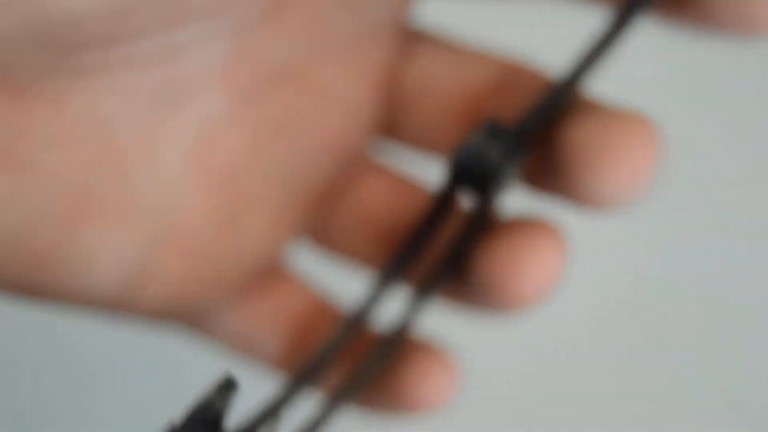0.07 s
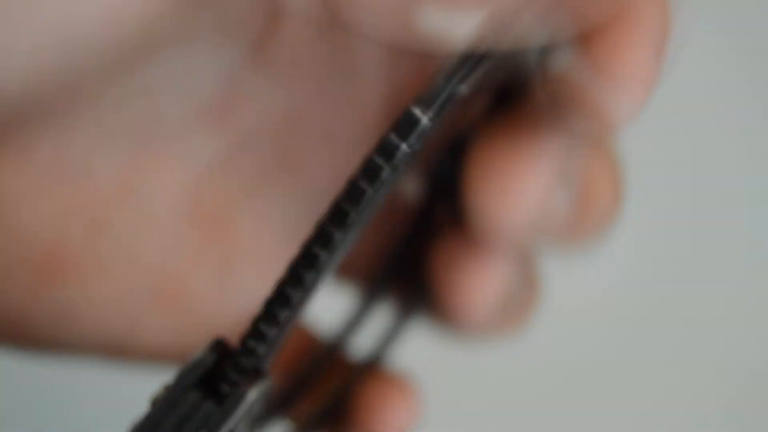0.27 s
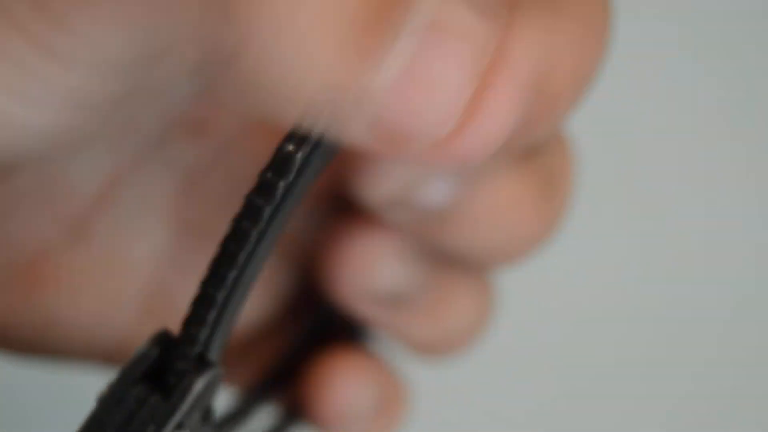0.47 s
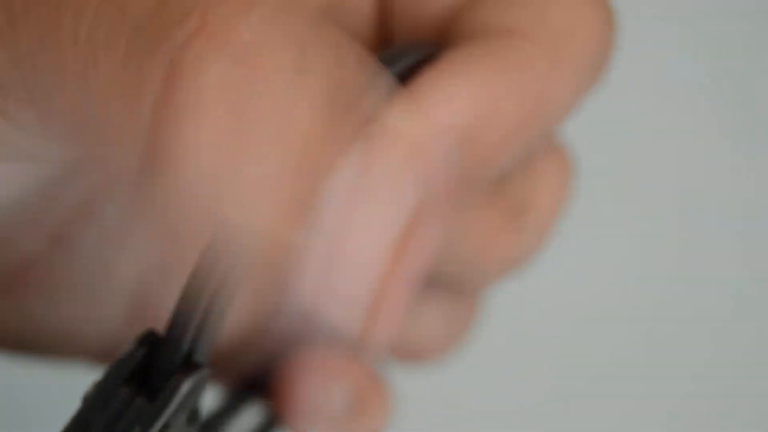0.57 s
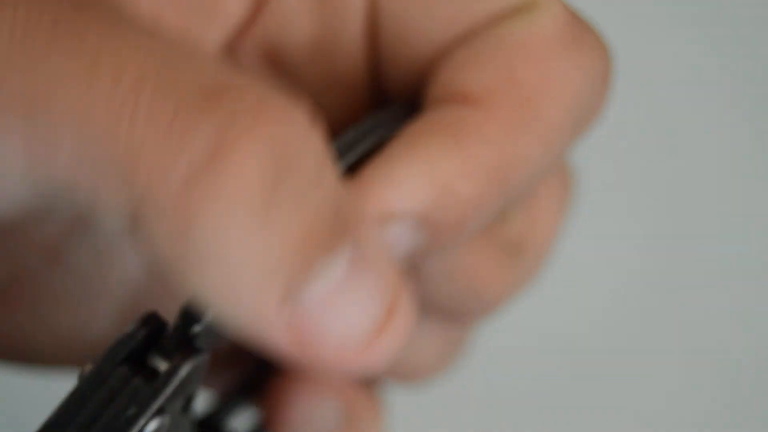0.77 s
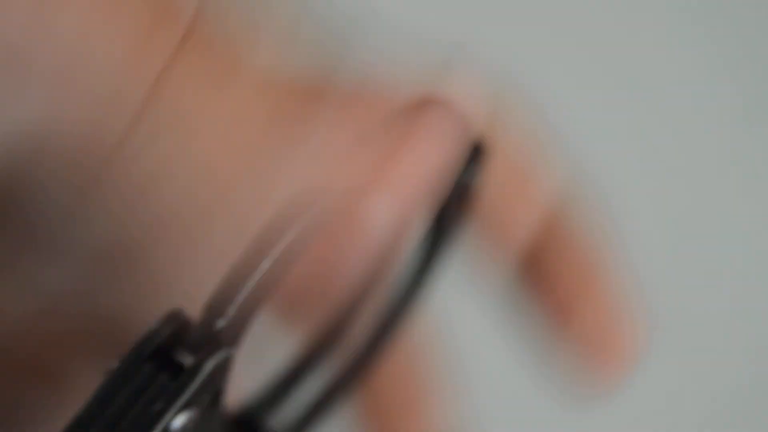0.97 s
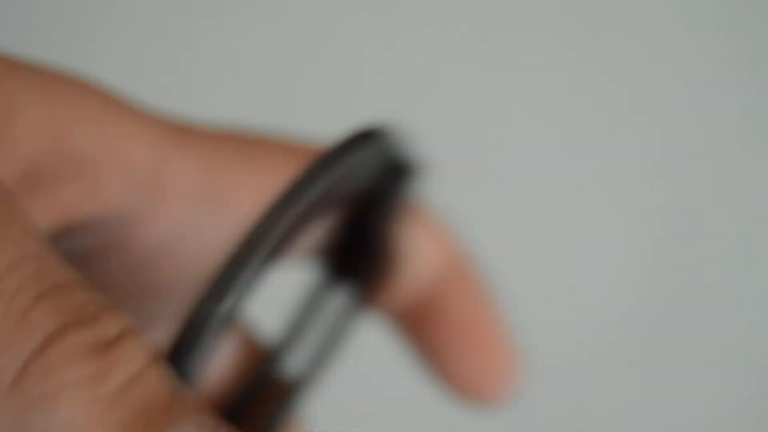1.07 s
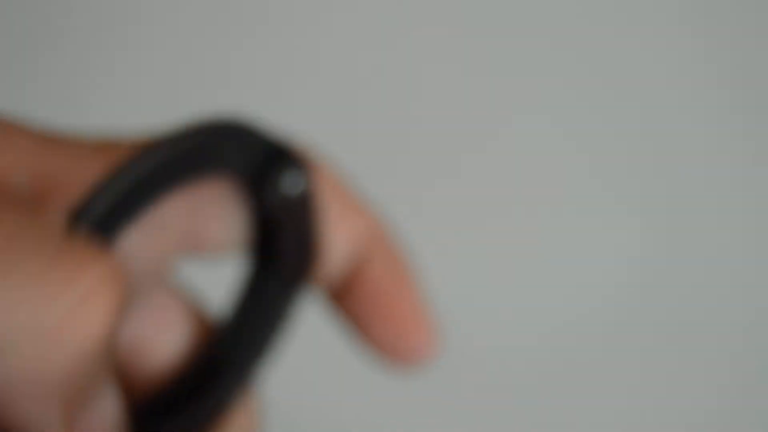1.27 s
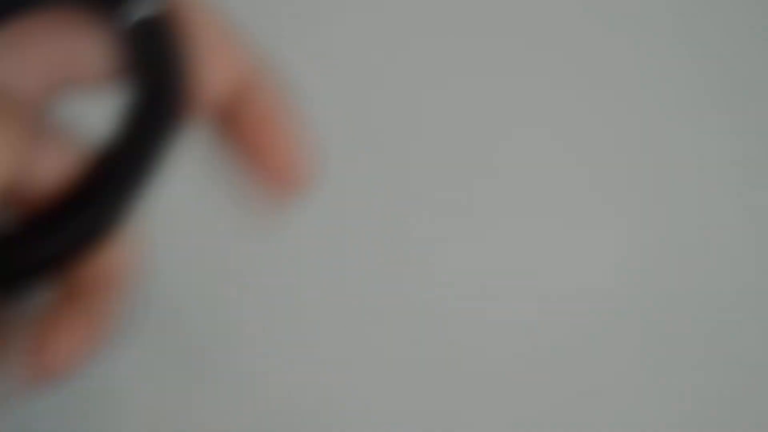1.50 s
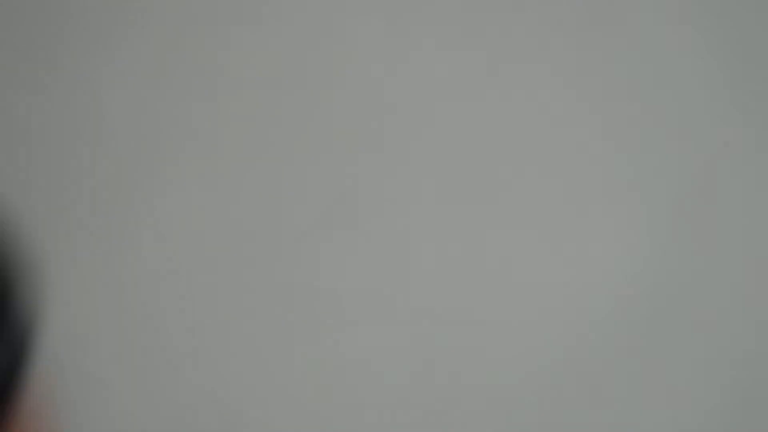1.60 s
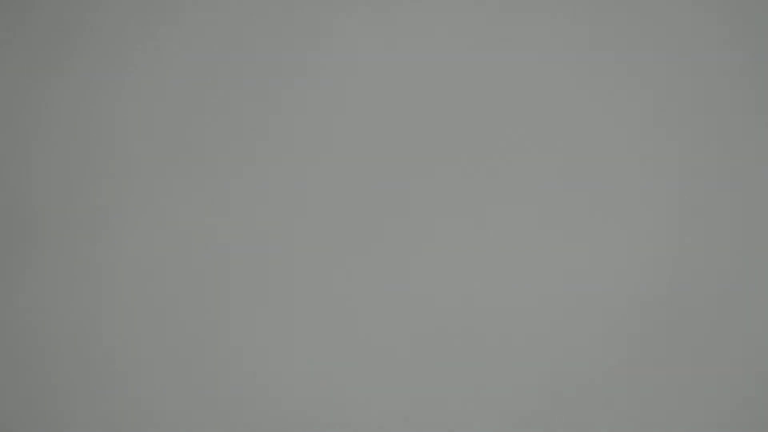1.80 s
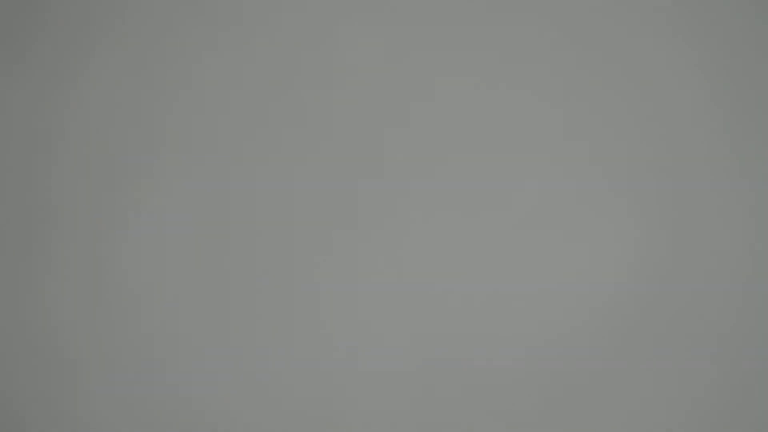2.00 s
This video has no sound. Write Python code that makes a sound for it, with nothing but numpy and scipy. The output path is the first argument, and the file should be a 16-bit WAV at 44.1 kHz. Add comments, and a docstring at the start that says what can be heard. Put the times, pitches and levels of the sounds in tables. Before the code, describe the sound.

Steel handcuffs ratchet in a quick burst of sharp clicks, then their chain clinks.

```python
"""Steel handcuffs ratchet: teeth rip past the pawl, a small catch, in three quick pushes.
They are worked by hand close to the microphone in a quiet room. First the bow, the swinging arm,
knocks against the lock. After the ratcheting, the frame and chain links clink and the hinge snaps
as the cuff is turned over. The loudest clicks overload the recorder."""
import sys
import numpy as np
from scipy import signal
from scipy.fft import rfft, irfft, next_fast_len
from scipy.io import wavfile

SR = 44100
rng = np.random.default_rng(int(sys.argv[2]) if len(sys.argv) > 2 else 0)


def to_wav(sig):
    """Store sig (one row per channel, or 1-D mono) as 16-bit WAV at the path in sys.argv[1].

    Samples outside -1..1 are clipped; the rate is SR.
    """
    pcm = np.clip(np.atleast_2d(sig), -1, 1) * 32767
    pcm = np.round(pcm).astype(np.int16)
    wavfile.write(sys.argv[1], SR, pcm.T)  # frames by channels


N = 90404


def gain(db):
    """Turn decibels into a multiplier."""
    return 10 ** (np.asarray(db) / 20)


def unit_energy(x):
    """Scale a sound so that its energy is 1."""
    return x / np.sqrt(np.sum(x ** 2) + 1e-18)


def fade(fade_s, size=16384):
    """A curve that falls by 60 dB every fade_s seconds."""
    return np.exp(-np.log(1000) * np.arange(size) / SR / fade_s)


def add(out, start_s, sound):
    """Mix a sound into out, beginning at start_s."""
    i = int(start_s * SR)
    out[i:i + len(sound)] += sound[:N - i]


def shape_tone(x, tone, peak_hz=0, peak_db=0, half_width_hz=1030):
    """Filter a sound along (pitch_hz, level_db) points, with an optional boost around one pitch."""
    n = next_fast_len(len(x) // 2 + 2048) * 2
    freqs = np.maximum(np.arange(n // 2 + 1) * SR / n, 1)
    hz, db = np.array(tone).T
    curve_db = np.interp(np.log(freqs), np.log(hz), db)
    curve_db += peak_db / (1 + ((freqs - peak_hz) / half_width_hz) ** 2)
    # Build the filter so that nothing sounds before the hit.
    cepstrum = irfft(np.log(gain(curve_db)))
    cepstrum[1:n // 2] *= 2
    cepstrum[n // 2 + 1:] = 0
    return irfft(rfft(x, n) * np.exp(rfft(cepstrum)))[:len(x)]


def click(tone, fade_s, peak_hz=0, peak_db=0, size=4096):
    """A burst of noise dies at once and leaves a short shimmer, as when steel hits steel."""
    shimmer = gain(-12.5) * fade(0.023, size)
    noise = rng.standard_normal(size) * (fade(fade_s, size) + shimmer)
    burst = shape_tone(noise, tone, peak_hz, peak_db)
    return unit_energy(burst) * np.sqrt(SR / 1000)  # as strong as 1 ms at full scale


def ring(notes, size=16384):
    """A struck part rings with several notes, each fading at its own speed."""
    t = np.arange(size) / SR
    strengths = unit_energy(gain([db for _, db, _ in notes])) * np.sqrt(2)
    return sum(strength * fade(fade_s, size) * np.sin(2 * np.pi * (hz * t + rng.random()))
               for strength, (hz, _, fade_s) in zip(strengths, notes))


# The room's steady noise: pitch_hz, relative_db
AIR_TONE = [(15, -16), (25, -9.5), (277, -0.5), (936, -12.5), (1190, -11), (1740, -15.5), (2910, -17.5),
            (3430, -18.5), (5280, -18.5), (5730, -18.5), (6740, -26), (7310, -15), (8140, -27),
            (10100, -25), (11300, -22), (13200, -27), (16000, -24)]
# The notes of the hum: pitch_hz, level_db
HUM_NOTES = [(59.5, -64.5), (75.4, -65), (118.4, -62.5), (253, -74)]

def background():
    """The room rumbles, hisses and hums faintly."""
    t = np.arange(N) / SR
    hum = sum(gain(db) * np.sqrt(2) * np.sin(2 * np.pi * (hz * t + rng.random()))
              for hz, db in HUM_NOTES)
    air = unit_energy(shape_tone(rng.standard_normal(N), AIR_TONE))
    return hum + gain(-51.5) * np.sqrt(N) * air


# The tone of the echoes: pitch_hz, boost_db
ECHO_TONE = [(150, 8), (600, -2.5), (1500, 0.5), (3000, 1.5), (4600, 2), (7500, -5), (9300, -5.5),
             (11000, -2), (13000, -9.5), (15500, -11)]

def room(x, size=32768):
    """Nearby surfaces add quick echoes and a soft tail to the sound."""
    arrived = np.arange(size) / SR > 0.0047  # the first echo takes 4.7 ms
    early = gain(-15.5) * unit_energy(arrived * rng.standard_normal(size) * fade(0.092, size))
    tail = gain(-16.5) * unit_energy(arrived * rng.standard_normal(size) * fade(0.46, size))
    return x + signal.fftconvolve(x, shape_tone(early + tail, ECHO_TONE))[:N]


# How loudly the metal slides in the fingers: time_s, level_db
SCUFF_LEVELS = [(0, -58.5), (.2, -68), (.85, -76), (.97, -63), (1.06, -52.5), (1.19, -62), (1.28, -49),
                (1.32, -69), (1.62, -60), (1.8, -66), (1.91, -50.5), (2.05, -59)]
# How loudly skin rubs on the cuff: time_s, level_db
RUB_LEVELS = [(0, -65), (.55, -69), (.8, -58), (1.02, -51), (1.2, -60), (1.45, -56), (1.62, -63),
              (1.88, -51), (2.05, -65)]
# The dull tone of that rub: pitch_hz, relative_db
RUB_TONE = [(60, -12), (220, 2.5), (450, -1.5), (1000, -7), (2200, -7.5), (4000, -18), (12000, -24.5)]

def handling(scuffs_per_s=900, spread_db=9.5):
    """Metal slides in the hand: tiny scuffs with the lock's tone, over the dull rub of skin."""
    t = np.arange(N) / SR
    grains = (rng.random(N) < scuffs_per_s / SR) * gain(spread_db * rng.standard_normal(N))
    flicker = signal.fftconvolve(grains, fade(0.0095))[:N]
    scuffs = unit_energy(shape_tone(flicker * rng.standard_normal(N), LOCK_TONE))
    scuffs *= gain(np.interp(t, *np.array(SCUFF_LEVELS).T))
    rub = unit_energy(shape_tone(rng.standard_normal(N), RUB_TONE))
    rub *= gain(np.interp(t, *np.array(RUB_LEVELS).T))
    return (scuffs + rub) * np.sqrt(N)


# Dull taps on the lock case: start_s, level_db, pitch_hz
TAPS = [(0.2648, -28, 1800), (0.9957, -34.5, 3160), (1.205, -39, 3800), (1.2435, -26, 3860),
        (1.262, -53, 3700), (1.285, -37, 4300), (1.2963, -40.5, 4500), (1.3678, -36, 4370)]
# The tone of the case: pitch_hz, relative_db
CASE_TONE = [(150, -29), (800, -19), (2100, -2.5), (4000, 2.5), (6000, -2), (9000, -9), (15000, -26)]

def case_taps():
    """Soft touches make the hollow lock case sound."""
    out = np.zeros(N)
    for start_s, db, hz in TAPS:
        add(out, start_s, gain(db) * click(CASE_TONE, fade_s=0.02, peak_hz=hz, peak_db=9.5))
    return out


# The tone of the hinge: pitch_hz, relative_db
HINGE_TONE = [(200, -44), (1700, -42), (3700, -21.5), (5500, -29), (7900, -21), (8700, -10.5), (9800, -16),
              (11000, -3), (11800, 1.5), (12700, -9), (13700, -11), (15500, -32)]

def hinge(start_s=1.2437, level_db=-6.5):
    """The bow snaps over on its rivet with one thin, very high click."""
    out = np.zeros(N)
    add(out, start_s, gain(level_db) * click(HINGE_TONE, fade_s=0.0054))
    return out


# Clicks of the chain, and one knock on the frame near 1.66 s played the same way: start_s, level_db, pitch_hz,
# pitch_boost_db
LINK_CLICKS = [(.0157, -29, 11500, 9.5), (.029, -40, 11500, 6), (.0632, -39, 11500, 14),
               (.1442, -41, 11000, 3), (.1504, -32, 9500, 10), (.376, -23.5, 9400, 12.5),
               (.7832, -26, 9140, 14.5), (.8768, -26.5, 8500, -6), (.879, -19.5, 10200, 2),
               (.8815, -20.5, 8500, 7), (.9107, -28, 8000, 6), (.9197, -10.5, 10640, 9.5),
               (.922, -23, 8700, 10), (.9281, -25, 10000, 10), (.9374, -32.5, 11000, 6),
               (.9962, -31, 7740, -6), (1.0767, -35, 9100, 10), (1.0871, -28, 8350, 4),
               (1.1727, -34.5, 8550, 7), (1.2225, -40, 8950, 9), (1.2328, -35, 10100, 8),
               (1.3013, -31, 8000, 26), (1.3445, -35, 10000, 11), (1.3497, -16, 9200, 9),
               (1.3548, -18.5, 11100, 8), (1.3579, -11.5, 9200, 10.5), (1.3625, -28, 10600, 7),
               (1.4495, -16.5, 10700, 16), (1.4545, -15.5, 9400, 6), (1.4647, -18, 9100, -2),
               (1.4666, -23, 10500, 15), (1.4713, -22.5, 9500, 7), (1.5037, -27.5, 9000, 13),
               (1.6535, -24.5, 8160, 18), (1.6596, -16, 7650, 13), (1.6747, -14, 7700, 15),
               (1.6802, -32, 10000, 7), (1.6868, -18, 9500, 7), (1.6895, -11.5, 10400, 10),
               (1.6926, -6.5, 10300, 12.5), (1.7042, -21, 5250, 21), (1.7062, -19, 5600, 14),
               (1.7082, -31, 9500, 2), (1.7338, -30, 10500, 12), (1.7488, -13.5, 9600, 19),
               (1.8595, -46, 9000, 0), (1.863, -38, 8800, 11.5), (1.9002, -32.5, 8300, 4),
               (1.9162, -33, 7800, 6), (1.9292, -39, 8950, 9)]
# The tone all links share: pitch_hz, relative_db
LINK_TONE = [(200, -45), (1500, -22), (3000, -17.5), (4300, -3.5), (6300, -5), (8000, 2.5), (12400, 0),
             (13500, -7), (15500, -12.5)]

def chain_links():
    """Small links touch, and the frame is knocked once; each click has its own bright pitch and dies quickly."""
    out = np.zeros(N)
    for start_s, db, hz, boost_db in LINK_CLICKS:
        add(out, start_s, gain(db) * click(LINK_TONE, fade_s=0.0095, peak_hz=hz, peak_db=boost_db))
    return out


# Knocks of the bow on the lock, and knocks on the frame:
# start_s, level_db, ring_relative_db, ring_time_factor
BOW_HITS = [(.2386, -25, -15, 1), (.2478, -8.5, -5.5, .5), (.2531, -11, 0.5, .6), (.2643, -6.5, -25, .9),
            (.2686, -20, -22, 1), (.2742, -21.5, -14, 1.2)]
FRAME_HITS = [(1.4567, -7.5, -15, 0.47), (1.4582, -5, -6.5, 0.32), (1.4617, -5, -19, .5),
              (1.7119, -15, -9, .6), (1.7512, -7.5, -5.5, 0.71), (1.7597, -19, -20, 0.87),
              (1.9812, -26.5, -4.5, 0.79)]
# The tone of each part's click: pitch_hz, relative_db
BOW_TONE = [(200, -42), (900, -42), (1700, -19.5), (3200, -21), (4500, -8.5), (7500, 3), (12000, 1.5),
            (14000, -10), (15500, -13.5)]
FRAME_TONE = [(200, -31), (1800, -30.5), (2800, -17), (4500, -19), (6000, -10), (10200, 0.5), (12000, -8),
              (15500, -15.5)]
# The notes each part rings with when free: pitch_hz, relative_db, fade_s
BOW_NOTES = [(4260, -7.5, 0.12), (7310, -7, 0.16), (8225, -3, 0.11), (8050, -4, 0.17), (9430, 6.5, 0.091),
             (10700, -2, 0.11), (11660, 7.5, 0.033), (12675, -6, 0.16)]
FRAME_NOTES = [(2782, -12.5, 0.05), (3246, -10.5, 0.032), (4340, -16.5, 0.062), (5750, -3.5, 0.024),
               (6995, -10.5, 0.074), (7750, 2.5, 0.047), (8204, -18, 0.073), (10200, -19, 0.058)]

def knocks(hits, tone, notes):
    """A steel part is struck: it clicks, then rings for as long as the fingers allow."""
    out = np.zeros(N)
    for start_s, db, ring_db, time_factor in hits:
        held_notes = [(hz, note_db, fade_s * time_factor) for hz, note_db, fade_s in notes]
        add(out, start_s, gain(db) * click(tone, fade_s=0.013))
        add(out, start_s, gain(db + ring_db) * ring(held_notes))
    return out


# The pawl drops off a tooth: start_s, level_db, thump_relative_db
TOOTH_DROPS = [(0.4502, -12, -41), (0.4543, -9, -45), (0.4564, 1.5, -33), (.4655, -6, -34),
               (.4668, -9.5, -33), (0.4875, -14.5, -38), (0.4908, -1.5, -39), (.4942, -8, -47),
               (0.4965, -5.5, -32), (0.5028, -4.5, -45), (0.5631, -9, -37), (0.5671, -3, -37),
               (0.5708, -5.5, -23), (0.5762, -1.5, -20), (0.582, -3.5, -41), (0.5878, -3.5, -37),
               (0.5927, -2, -26), (0.5984, 0, -19.5), (0.6033, -5, -53), (0.6101, 1, -29.5)]
# The tones of the lock's click and of the low thump with it: pitch_hz, relative_db
LOCK_TONE = [(200, -46), (1350, -34), (1930, -20.5), (2350, -30.5), (3300, -26.5), (4000, -9.5),
             (6500, -12.5), (8000, -8), (9700, -0.5), (11500, -8.5), (13000, -13.5), (15500, -23)]
LOW_THUMP_TONE = [(30, -17), (150, -4), (350, -6), (600, -1.5), (1100, -6.5), (2000, 0), (5000, -8),
                  (15000, -40)]
# The notes the lock rings with: pitch_hz, relative_db, fade_s
LOCK_NOTES = [(1902, -1.5, 0.033), (4110, -8, 0.038), (4350, -29, 0.036), (5400, -4, 0.041),
              (8590, 6.5, 0.035), (9120, 2.5, .05), (9900, 4, 0.019), (10440, 3, 0.039)]

def ratchet(click_fade_s=0.0084, bounce_s=0.0025, bounce_db=-3, ring_db=-17.5):
    """At each tooth the pawl snaps down, bounces once and rings the lock."""
    out = np.zeros(N)
    for start_s, db, thump_db in TOOTH_DROPS:
        add(out, start_s, gain(db) * click(LOCK_TONE, click_fade_s))
        add(out, start_s + bounce_s, gain(db + bounce_db) * click(LOCK_TONE, click_fade_s))
        add(out, start_s, gain(db + ring_db) * ring(LOCK_NOTES))
        # A weak low thump comes with each loud tooth click, like an overloaded recorder.
        add(out, start_s, gain(db + thump_db) * click(LOW_THUMP_TONE, fade_s=0.016))
    return out


def scene():
    """All the parts of the cuffs sound in the room, on one channel."""
    cuffs = ratchet()
    cuffs += knocks(BOW_HITS, BOW_TONE, BOW_NOTES)
    cuffs += knocks(FRAME_HITS, FRAME_TONE, FRAME_NOTES)
    cuffs += chain_links() + hinge() + case_taps() + handling()
    return (room(cuffs) + background())[None]


def record(dry, top_hz=15750):
    """The recorder flattens the loudest peaks and cuts the highest treble."""
    treble_cut = signal.ellip(12, .1, 70, top_hz, fs=SR, output="sos")
    return signal.sosfilt(treble_cut, np.clip(dry, -1, 1))


dry = scene()
out = record(dry)
to_wav(out)
```